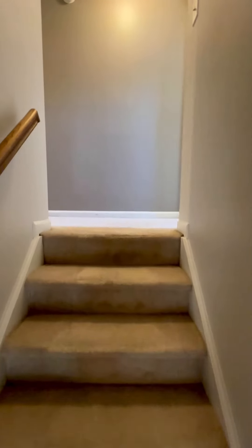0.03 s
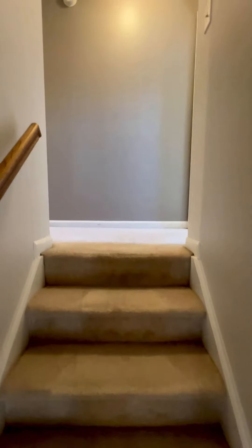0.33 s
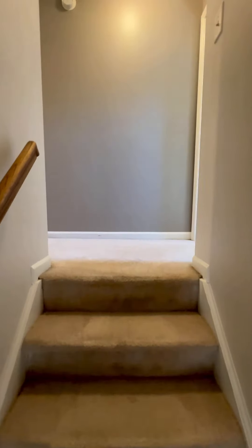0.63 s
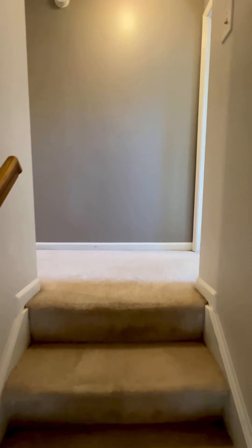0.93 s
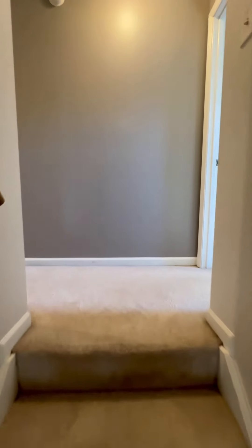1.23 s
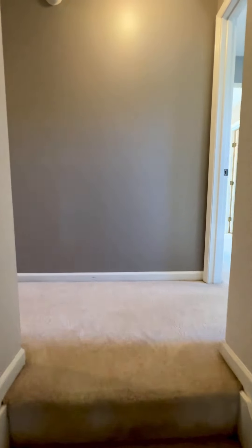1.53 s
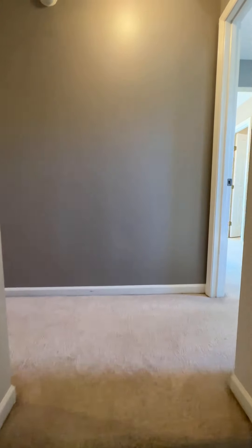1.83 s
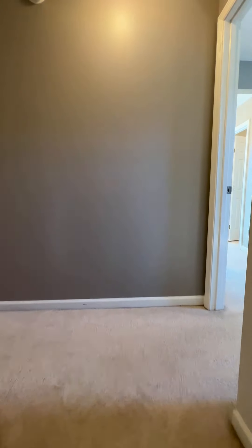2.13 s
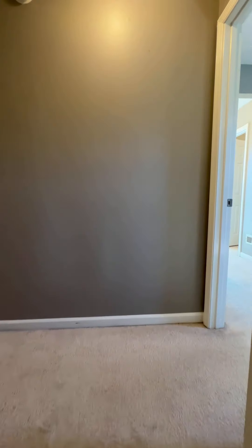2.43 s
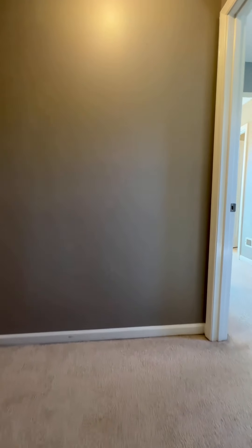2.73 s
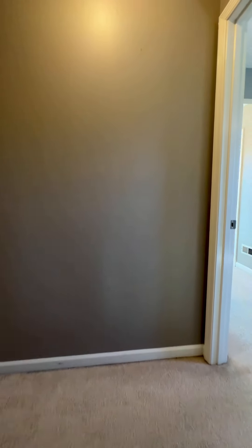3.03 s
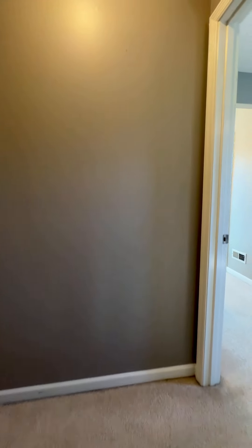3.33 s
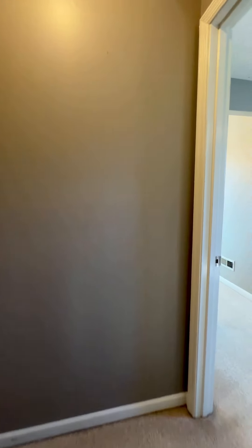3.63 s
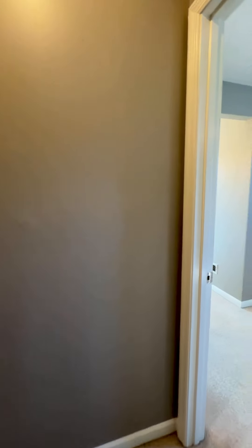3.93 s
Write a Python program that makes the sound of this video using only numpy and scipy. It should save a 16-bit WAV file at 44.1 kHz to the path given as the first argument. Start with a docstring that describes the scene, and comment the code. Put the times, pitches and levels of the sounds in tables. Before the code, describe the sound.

Soft footsteps thud up carpeted wooden stairs indoors, three light ones and then four heavier. They give way to soles brushing the carpet on the landing, with faint clothes rustle and a low room rumble close to the microphone.

```python
"""Someone climbs the last carpeted steps of a narrow wooden staircase and walks onto the landing.
Clothes rustle over a low indoor rumble and a faint whine from the start. Three light footfalls come
first, then four heavier ones: each thumps the boards, knocks in the stairwell and taps through the
pile, with scuffs and small ticks around them. In the last second the soles only brush the carpet
and the boards knock lightly as the weight shifts."""
import sys
import numpy as np
from scipy import signal
from scipy.fft import rfft, irfft
from scipy.io import wavfile
from scipy.ndimage import uniform_filter1d

SR = 44100
rng = np.random.default_rng(int(sys.argv[2]) if len(sys.argv) > 2 else 0)


def store_pcm(level_fs):
    """Save levels as 16-bit WAV."""
    pcm = np.round(np.clip(level_fs, -1, 1) * 32767).astype(np.int16)
    wavfile.write(sys.argv[1], SR, np.atleast_2d(pcm).T)


N = 176400
T = np.arange(N) / SR

# footfalls (time [s], thump [dB], board pitch [ratio], knock [dB], knock pitch [Hz], tap [dB],
# tap tilt [dB/octave], heel to ball and ball to toes [s], ball [dB re heel], toes [dB re heel])
FOOTFALLS = [(0.212, -37.5, 1.17, -37, 270, -54.5, 2, .02, -7, -4),
             (0.403, -37, 1.166, -50, 255, -45, 0.5, .022, -3, -8),
             (0.888, -38.5, 1.0, -37, 254, -48.5, 1.5, .018, 3.5, -3),
             (1.285, -30.5, 1.0, -37, 252, -49.5, 1, .0187, -4.5, -6),
             (1.684, -29.5, 1.0, -44, 257, -44, -1.5, .0187, -8.5, -8),
             (2.069, -31, 1.02, -40, 200, -40.5, 1, .0187, -4, -6),
             (2.803, -29.5, 1.22, -34, 214, -53, 0, .02, -7.5, -10)]
# modes of boards and joists (frequency [Hz], level [dB], t60 [s])
BOARD_MODES = [(76.2, -0.5, 0.33), (101.5, 2.5, 0.28), (160.4, 5.5, 0.17), (202.5, -4.5, 0.17),
               (242, -16.5, 0.27), (314.2, -6.5, 0.11), (384, -15, 0.28), (423, -18, 0.18), (810, -22, 0.1)]
# dull knock of a tread (frequency [multiple of its pitch], level [dB])
KNOCK_EQ = [(.28, -4), (.56, 3.5), (.92, 1.5), (1.36, -6), (2, -9.5), (3, -24.5), (4.8, -46), (12, -65)]
# sole tapping through the pile (frequency [Hz], level [dB])
TAP_EQ = [(200, 7.5), (450, 11), (850, 2.5), (1500, -3), (2400, -7), (3500, -22), (6000, -22.5),
          (12000, -60)]
# floor flexing underfoot (time [s], level [dB], pitch [Hz])
FLOOR_FLEXES = [(0.188, -31.5, 59.3), (0.511, -36, 64), (1.021, -35, 59.6), (1.502, -31.5, 69.7),
                (2.006, -34, 82)]
# light shifts of weight (time [s], level [dB], tilt [dB/octave])
WEIGHT_SHIFTS = [(0.805, -49.5, 4.5), (2.026, -49.5, -5), (2.95, -50, 0.5), (3.157, -45, 0.5),
                 (3.212, -52.5, 3.5), (3.571, -48.5, -2)]
# their hollow tone (frequency [Hz], level [dB])
SHIFT_EQ = [(80, -12), (190, 7), (380, 4), (640, 1.5), (900, -9), (2500, -39)]
# soles brushing carpet (time [s], attack [s], decay [s], hiss [dB], hiss tilt [dB/octave], body [dB])
CARPET_SCUFFS = [(0.864, 0.018, 0.037, -52, 0.7, -46), (1.441, .019, 0.018, -49.5, 1, -41.5),
                 (2.131, 0.034, 0.088, -61.5, -5, -59.5), (2.65, 0.12, 0.024, -79, -3, -52.5),
                 (3.334, 0.051, 0.043, -56.5, -1.5, -47), (3.405, 0.023, 0.018, -54.5, 0, -49),
                 (3.553, 0.014, 0.017, -57.5, -0.5, -52), (3.705, 0.01, 0.023, -56.5, 0.5, -51),
                 (3.878, 0.013, 0.058, -66, -8, -53.5)]
# hiss of the fibres (frequency [Hz], level [dB])
SCUFF_HISS_EQ = [(500, -12.5), (1050, 2.5), (1600, -1), (2900, 4), (4500, -4.5), (6300, -4.5), (8500, -11),
                 (11500, -32), (15500, -22)]
# rub of the floor below (frequency [Hz], level [dB])
SCUFF_BODY_EQ = [(120, -9.5), (280, 1), (450, -1.5), (650, -7.5), (1000, -21.5), (2000, -42)]
# small ticks (time [s], level [dB], ring [Hz])
SMALL_TICKS = [(0.169, -51, 4200), (0.402, -50, 1850), (0.418, -49, 2060), (0.808, -54.5, 2300),
               (2.081, -55.5, 3760), (2.698, -55, 900), (2.765, -57.5, 5200)]
# tone of a tick (frequency [multiple of its ring], level [dB])
TICK_EQ = [(.25, -38), (.83, -2.5), (1, 3), (1.2, -5.5), (6, -50.5)]
# rubbing fabric (frequency [Hz], level [dB])
RUSTLE_EQ = [(300, 7.5), (700, 10), (1400, 0), (2300, 3), (3300, 0), (4800, -2), (6300, 1.5), (7300, -7),
             (9900, -12), (11000, -41), (15500, -20)]
# rise and fall of the rustle (time [s], level [dB])
RUSTLE_FADER = [(0, -63.5), (.15, -66), (.25, -65), (1.06, -63), (1.18, -65), (1.36, -60.5), (1.96, -64.5),
                (2.1, -62), (2.54, -63), (2.62, -74.5), (2.71, -61), (3.17, -63.5), (3.27, -67.5),
                (3.35, -63), (3.79, -61.5), (3.87, -64), (4, -61.5)]
# indoor rumble (frequency [Hz], level [dB])
RUMBLE_EQ = [(20, -42), (31, -31.5), (42, -14.5), (54, 0), (75, -1.5), (100, -5.5), (135, -14.5),
             (195, -14.5), (260, -23.5), (400, -27.5), (700, -38.5), (1300, -49), (6000, -88.5)]
# drift of the rumble (time [s], level [dB])
RUMBLE_FADER = [(0, -44.5), (1.8, -42), (4, -43)]
# swells of the whine (time [s], level [dB])
WHINE_FADER = [(0, -77), (.15, -80), (.22, -85), (1.25, -85), (1.42, -77), (1.8, -84.5), (4, -86.5)]
# stairwell reverb (frequency [Hz], level [dB])
TAIL_EQ = [(100, -7), (3000, -11.5), (12000, -15.0)]
# stereo balance (frequency [Hz], left minus right [dB])
BALANCE_EQ = [(150, 0), (280, -1.8), (1000, -2), (2000, 0), (6000, -1), (22050, 0)]

JOIST_TOP_HZ, DETUNE, BLOOM_CYCLES = 400, 0.0043, 0.65
SETTLE_AFTER_S, SETTLE_FADE_S, SETTLE_DB = 0.047, 0.0062, -4.5  # the planted foot damps the boards
HEEL_RATIO, HEEL_DB = 2.12, -4  # blunt first stroke; pitch and level re the knock
GRAIN_RATE_HZ = 650  # texture of carpet and cloth
RUMBLE_EVEN, RUMBLE_SWELL_S = 0.58, 0.07  # share of the random swells evened out, and their length
WHINE_HZ, WHINE_WAVER_HZ = 1982, 8.07
ROOM_T60_S, ROOM_DB, PREDELAY_S = 0.47, -10.5, 0.015
WALL_S, WALL_DB = 0.012, -7.5  # longest delay and joint level of the early echoes
WIDE_HZ, WIDE_SHARE = 385, 0.9  # above this frequency the two ears differ
ROLL_OFF_DB_PER_OCTAVE, TOP_HZ = 11, 15750


def footfalls():
    """Heel, ball and toes strike a carpeted tread; returns the thumps, and the knocks with their taps."""
    thumps, knocks = 0, 0
    for step, detune in zip(FOOTFALLS, rng.standard_normal((len(FOOTFALLS), len(BOARD_MODES)))):
        start, thump_db, ratio, knock_db, knock_hz, tap_db, tilt_db, roll_s, ball_db, toe_db = step
        ring = sum(undb(db) * boards(start + k * roll_s, ratio, detune)
                   for k, db in enumerate([0, ball_db, toe_db]))
        planted = np.clip((T - start - SETTLE_AFTER_S) / SETTLE_FADE_S, 0, 1)
        thumps += undb(thump_db + SETTLE_DB * planted) * ring
        heel_tone = np.sin(2 * np.pi * HEEL_RATIO * knock_hz * (T - start))
        heel = undb(HEEL_DB) * burst(start, attack=0.0025, decay=0.0031) * heel_tone
        wood = noise([(knock_hz * k, db) for k, db in KNOCK_EQ])
        knock = burst(start, attack=0.0017, hold=0.026, decay=0.019) * wood
        tap = burst(start, attack=0.00062, hold=0.0021, decay=0.016) * noise(TAP_EQ, tilt_db)
        knocks += undb(knock_db) * (heel + knock) + undb(tap_db) * tap
    return thumps, knocks


def boards(start, ratio, detune):
    """Each mode blooms under the cushioned blow and rings out; the low ones take the tread's pitch."""
    ring, first = np.zeros(N), int(start * SR)
    age = np.maximum(T[first:first + SR // 2] - start, 0)
    for (hz, db, t60), offset in zip(BOARD_MODES, detune):
        pitch = hz * (ratio if hz < JOIST_TOP_HZ else 1) * (1 + DETUNE * offset)
        bloom = 1 - np.exp(-age * hz / BLOOM_CYCLES)
        decay = np.exp(-np.log(1000) * age / t60)
        ring[first:first + len(age)] += undb(db) * bloom * decay * np.sin(2 * np.pi * pitch * age)
    return ring


def floor_flexes():
    """Deep soft heaves of the floor as the weight moves over it."""
    return sum(undb(db) * burst(start, attack=0.0036, hold=0.007, decay=0.051)
               * np.sin(2 * np.pi * hz * (T - start)) for start, db, hz in FLOOR_FLEXES)


def weight_shifts():
    """Small hollow knocks of the boards as the weight moves."""
    return sum(undb(db) * burst(start, attack=0.0046, hold=0.0084, decay=0.019)
               * noise(SHIFT_EQ, tilt_db) for start, db, tilt_db in WEIGHT_SHIFTS)


def scuffs():
    """Carpet fibres flick under a sliding sole: a grainy hiss over a hollow rub from the floor below."""
    hiss, body_level = 0, 0
    for start, attack, decay, hiss_db, tilt_db, body_db in CARPET_SCUFFS:
        hiss += undb(hiss_db) * burst(start, attack, decay) * noise(SCUFF_HISS_EQ, tilt_db)
        body_level += undb(body_db) * burst(start, attack, decay, hold=0.014)
    return hiss * flutter(GRAIN_RATE_HZ, depth_db=2.5) + body_level * noise(SCUFF_BODY_EQ)


def ticks():
    """Brief clicks, each with its own ring."""
    return sum(undb(db) * burst(start, attack=0.00037, decay=0.0024)
               * noise([(hz * k, eq_db) for k, eq_db in TICK_EQ]) for start, db, hz in SMALL_TICKS)


def clothes():
    """Fabric rubs as the body moves, with a fine grain and a slower sway."""
    rustle = noise(RUSTLE_EQ) * curve(RUSTLE_FADER)
    return rustle * flutter(GRAIN_RATE_HZ, depth_db=0.5) * flutter(rate_hz=17, depth_db=1.5)


def room_tone():
    """A bed of even low rumble with a faint wavering whine."""
    rumble = noise(RUMBLE_EQ)
    power = uniform_filter1d(np.mean(rumble ** 2, axis=0), int(RUMBLE_SWELL_S * SR))
    even_rumble = rumble / power ** (RUMBLE_EVEN / 2)
    pitch = WHINE_HZ + WHINE_WAVER_HZ * wander(rate_hz=30)
    whine = np.sqrt(2) * np.sin(2 * np.pi * np.cumsum(pitch) / SR)
    return even_rumble * curve(RUMBLE_FADER) + whine * curve(WHINE_FADER)


def stairwell(x):
    """The narrow stairwell adds a short reverb tail."""
    tail = noise(TAIL_EQ) * burst(PREDELAY_S, attack=0.0064, decay=ROOM_T60_S / np.log(1000))
    tail = tail[:, :SR] / np.sqrt(np.sum(tail ** 2) / 2)
    return x + undb(ROOM_DB) * signal.fftconvolve(x, tail, axes=1)[:, :N]


def walls(x, count=10):
    """Early echoes off the close walls, different for each ear, colour the sound."""
    echoes = np.zeros((2, SR // 10))
    echoes[:, 0] = 1  # direct sound
    for ear in range(2):
        lags = (WALL_S * SR * rng.uniform(0.1, 1, count)).astype(int)
        echoes[ear, lags] += undb(WALL_DB) * rng.choice([-1, 1], count) / np.sqrt(count)
    return signal.fftconvolve(x, echoes, axes=1)[:, :N] / np.sqrt(1 + undb(WALL_DB) ** 2)


def undb(db):
    """Decibels to gain."""
    return 10 ** (np.asarray(db) / 20)


def curve(rows):
    """Gain over time from (time [s], level [dB]) points."""
    return undb(np.interp(T, *np.array(rows).T))


def colour(rows):
    """EQ gain from (frequency [Hz], level [dB]) points, rolling off above the last."""
    hz, db = np.array(rows).T
    octave = np.log2(np.fft.rfftfreq(N, 1 / SR) + 1)
    roll_off = ROLL_OFF_DB_PER_OCTAVE * np.maximum(octave - np.log2(hz[-1]), 0)
    return undb(np.interp(octave, np.log2(hz), db) - roll_off)


def noise(rows, tilt_db=0):
    """Coloured stereo noise of rms 1, tilted per octave: centred bass, wide treble."""
    mid, side = rfft(rng.standard_normal((2, N)))
    high = (np.fft.rfftfreq(N, 1 / SR) / WIDE_HZ) ** 4
    side_share = WIDE_SHARE * high / (1 + high) / 2
    stereo = np.sqrt(1 - side_share) * mid + np.sqrt(side_share) * side * np.array([[1], [-1]])
    eq = colour([(hz, db + tilt_db * np.log2(hz)) for hz, db in rows])
    x = irfft(eq * stereo, N)
    return x / x.std()


def wander(rate_hz):
    """Glides between random values at the given rate."""
    return np.interp(T * rate_hz, np.arange(N), rng.standard_normal(N))


def flutter(rate_hz, depth_db):
    """Random gain of rms 1 that changes at the given rate."""
    gain = undb(depth_db * wander(rate_hz))
    return gain / np.sqrt(np.mean(gain ** 2))


def burst(start, attack, decay, hold=0):
    """Envelope with a linear attack, a hold and an exponential decay, all in seconds."""
    age = T - start
    return np.clip(age / attack, 0, 1) * np.exp(-np.maximum(age - attack - hold, 0) / decay)


def scene():
    """Dry low thumps, foot detail in the stairwell reverb, then clothes and room tone."""
    thumps, knocks = footfalls()
    detail = knocks + weight_shifts() + walls(scuffs()) + ticks()
    return thumps + floor_flexes() + stairwell(detail) + walls(clothes()) + room_tone()


def record(dry):
    """The microphones lean slightly right and the top is cut."""
    lean = np.sqrt(colour(BALANCE_EQ))
    heard = irfft(rfft(dry) * np.array([lean, 1 / lean]), N)
    return signal.sosfilt(signal.ellip(8, 0.2, 70, TOP_HZ, fs=SR, output="sos"), heard)


dry = scene()
out = record(dry)
store_pcm(out)
```